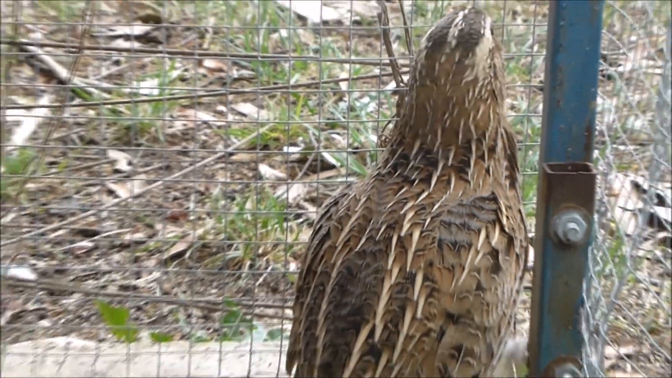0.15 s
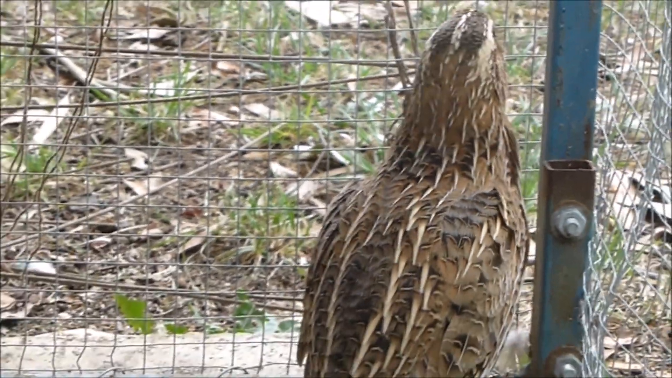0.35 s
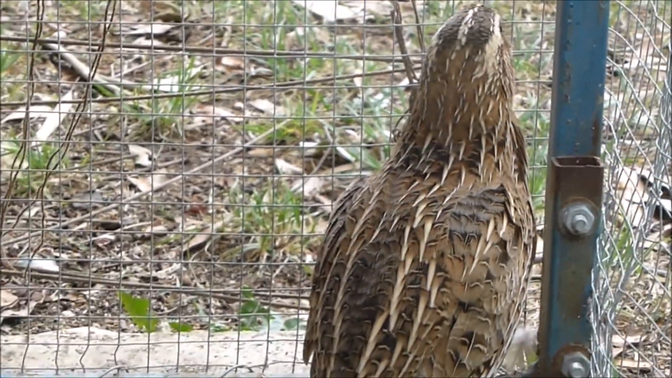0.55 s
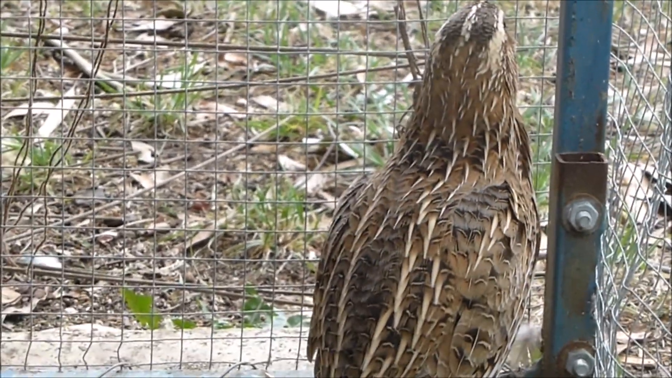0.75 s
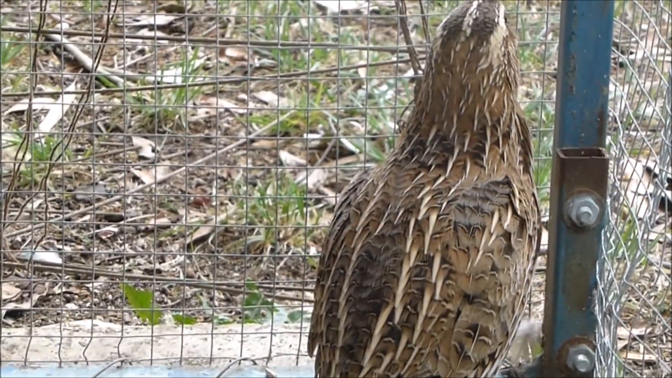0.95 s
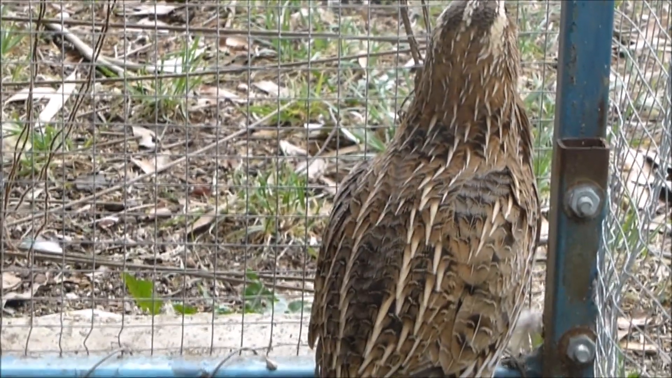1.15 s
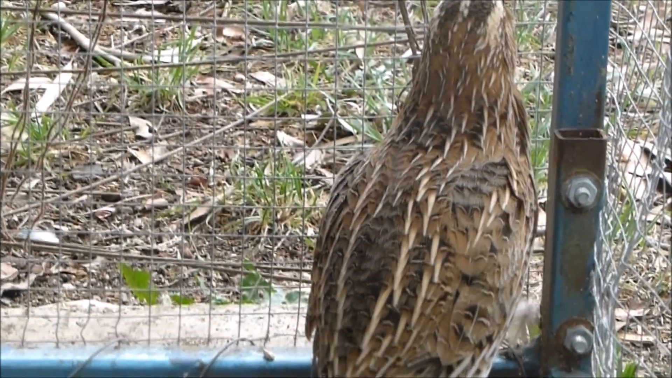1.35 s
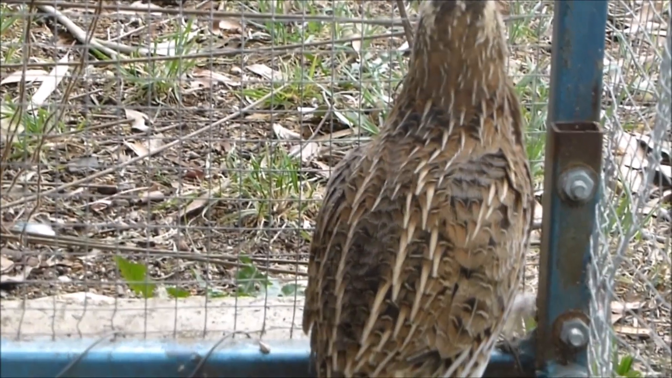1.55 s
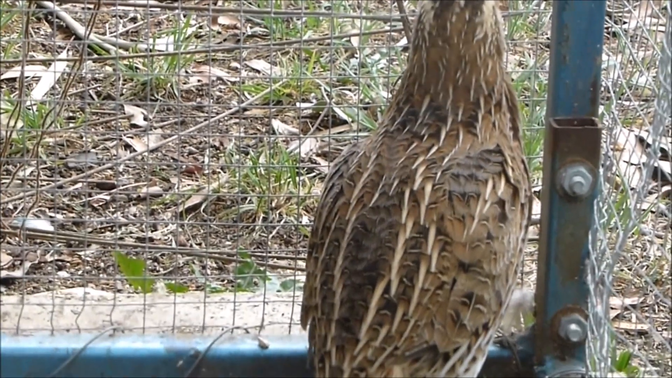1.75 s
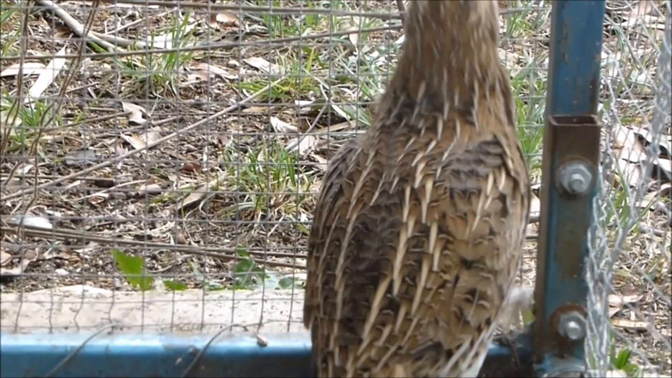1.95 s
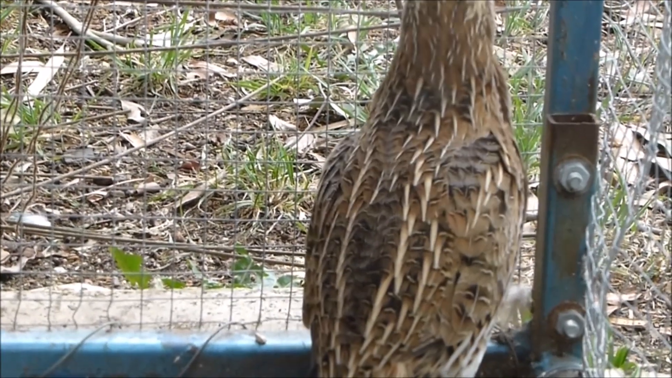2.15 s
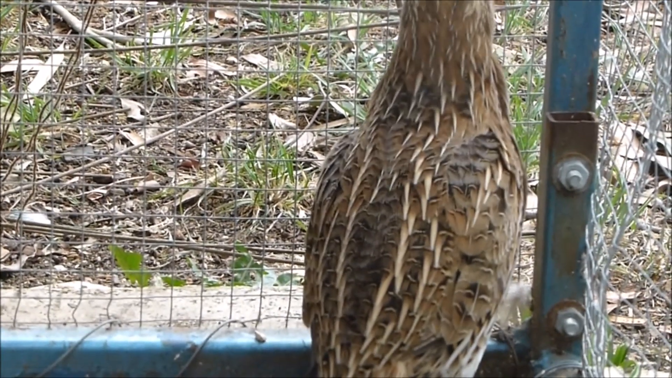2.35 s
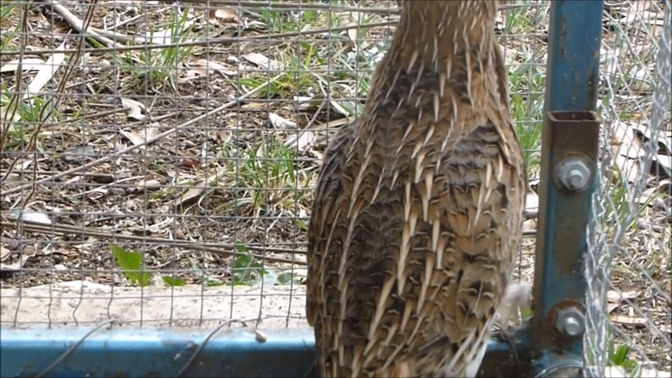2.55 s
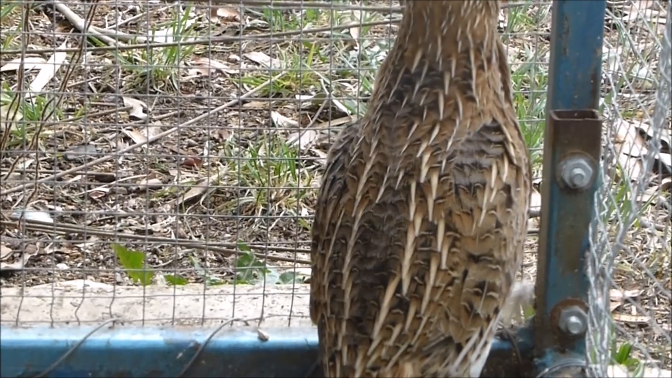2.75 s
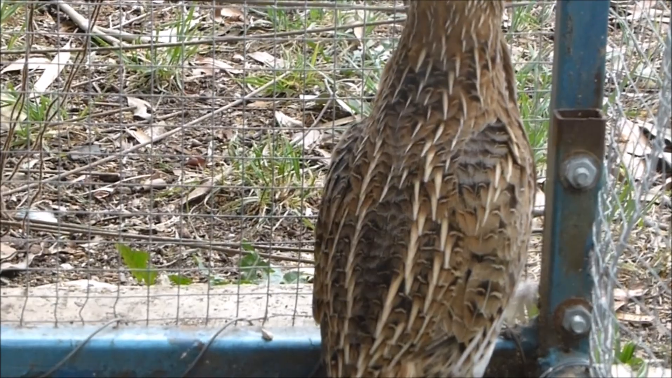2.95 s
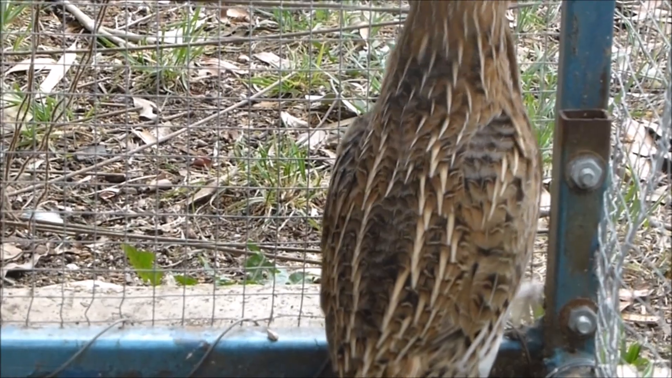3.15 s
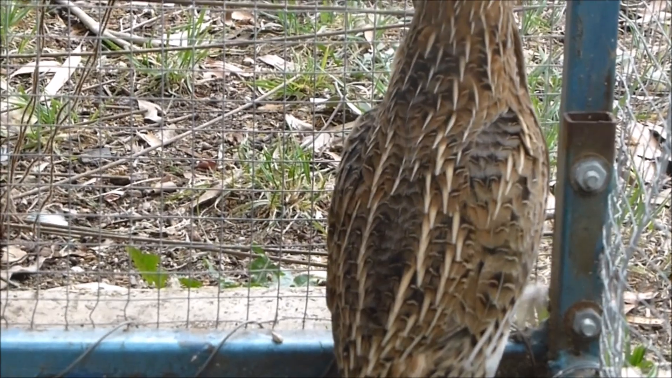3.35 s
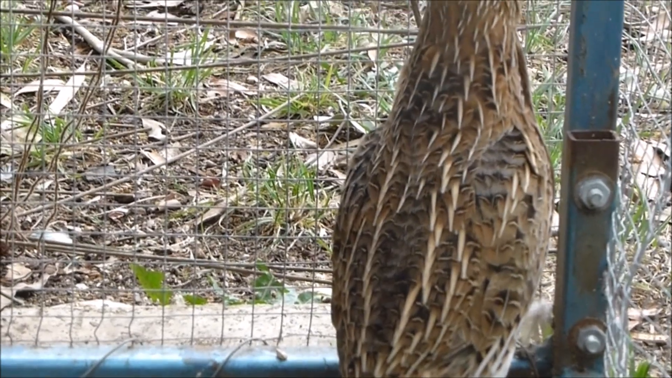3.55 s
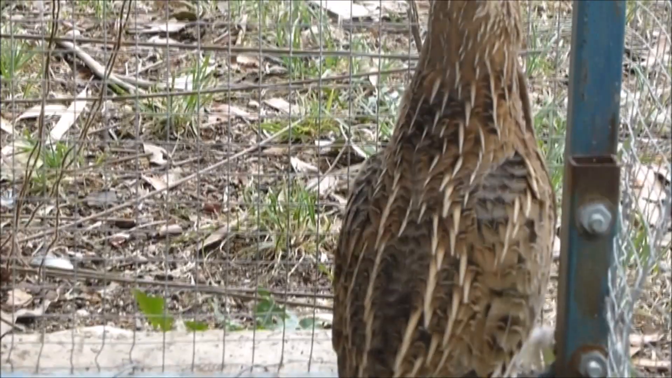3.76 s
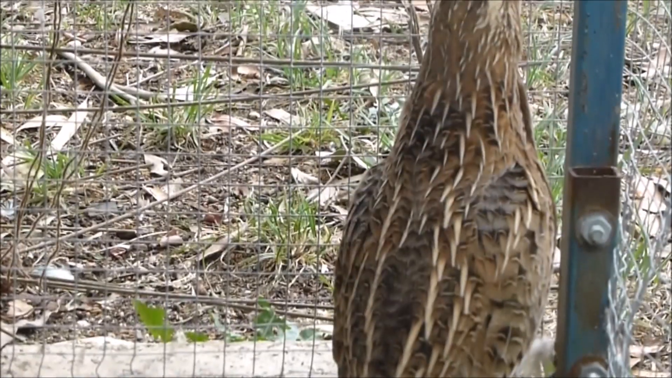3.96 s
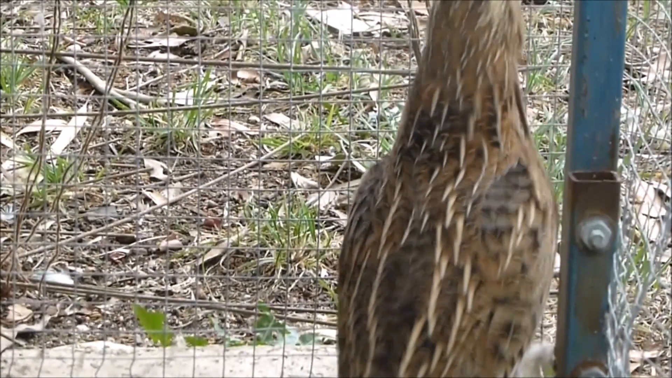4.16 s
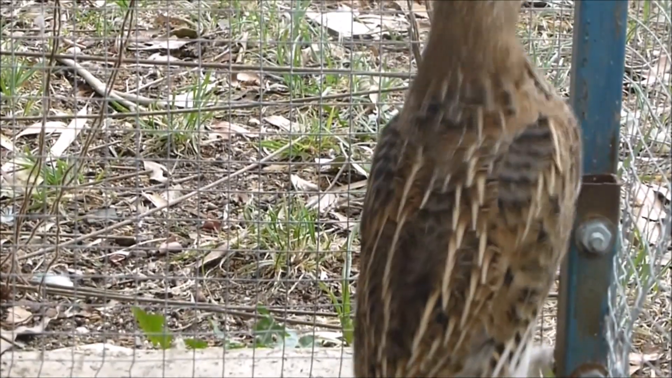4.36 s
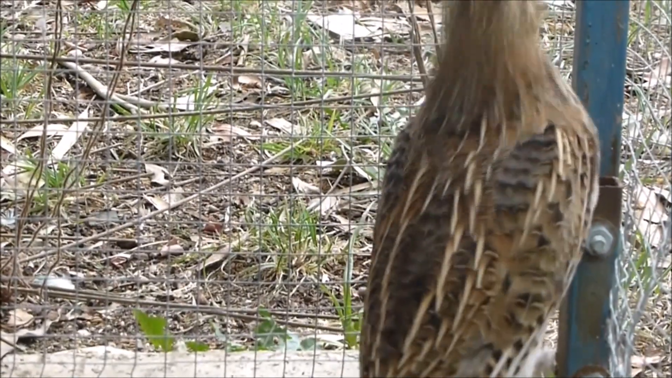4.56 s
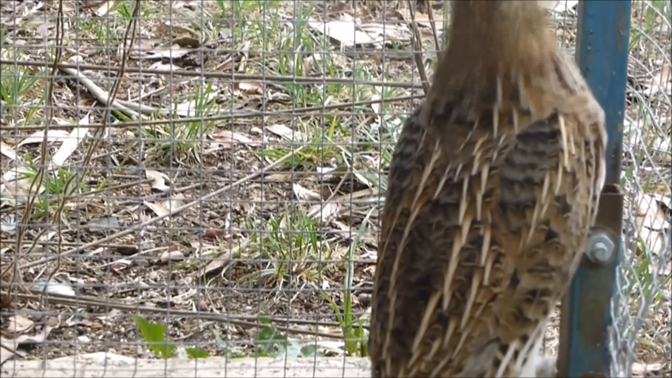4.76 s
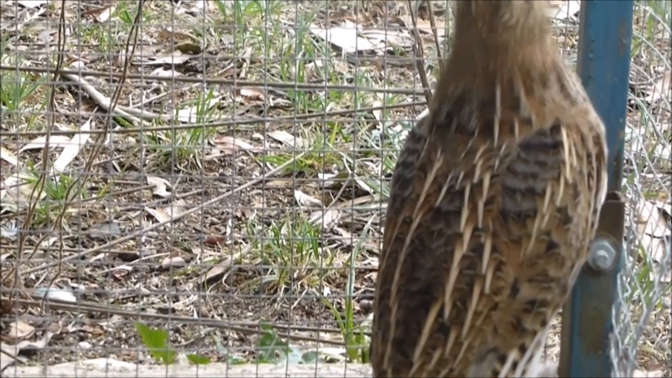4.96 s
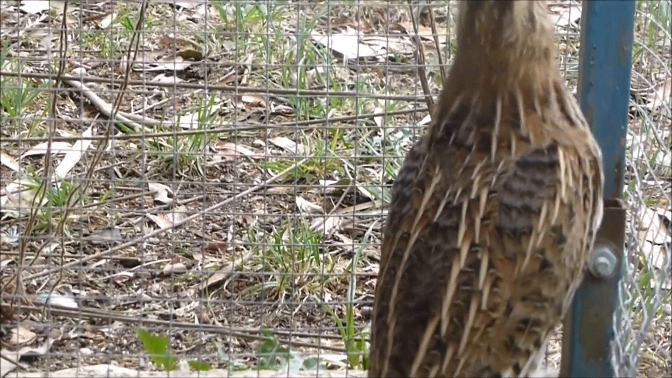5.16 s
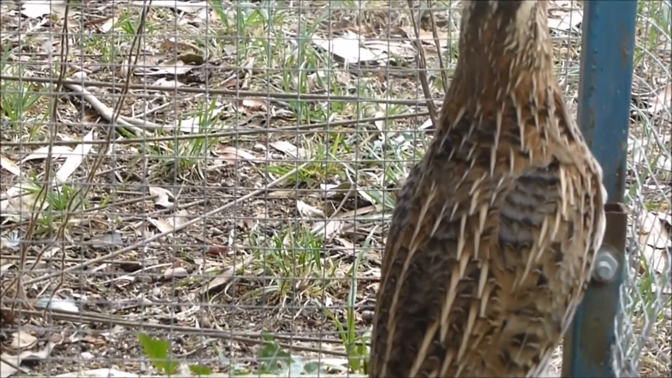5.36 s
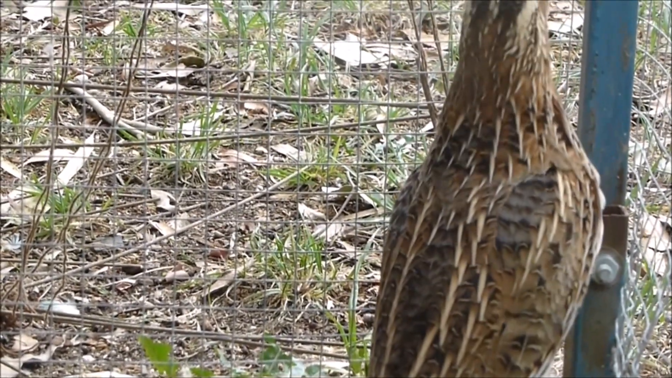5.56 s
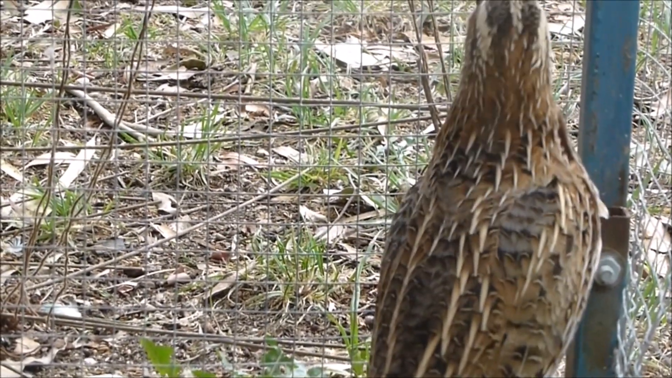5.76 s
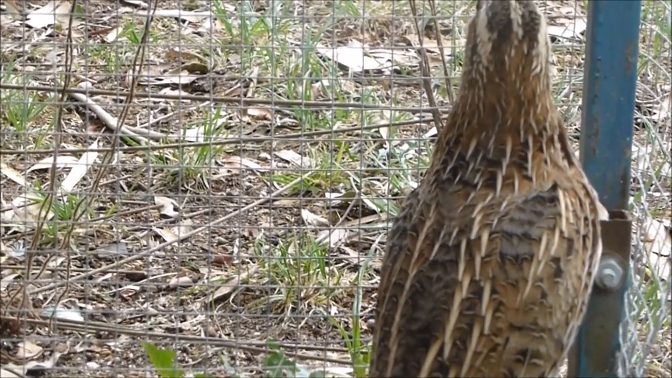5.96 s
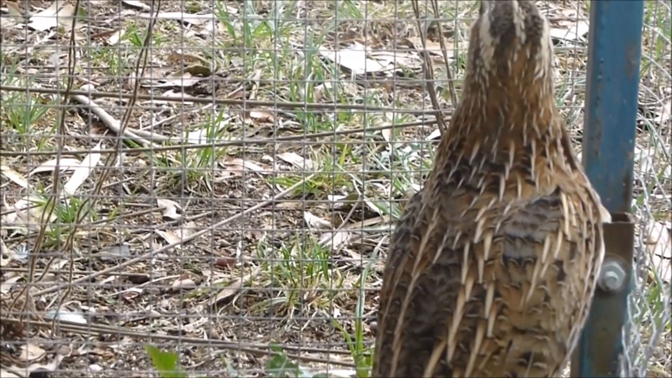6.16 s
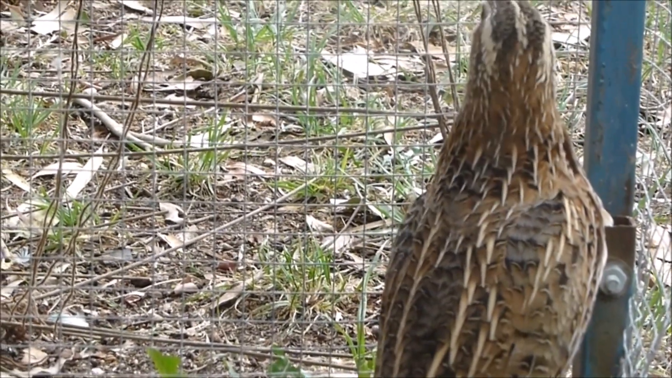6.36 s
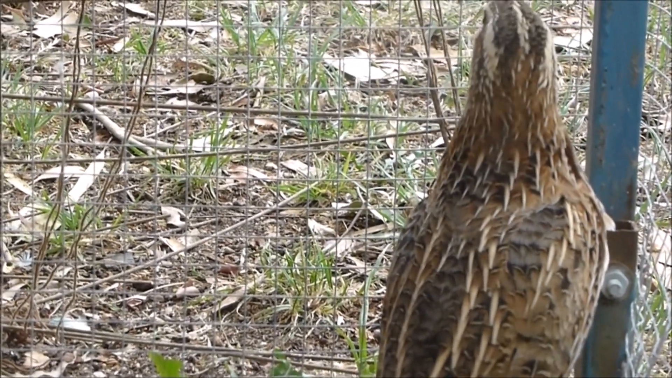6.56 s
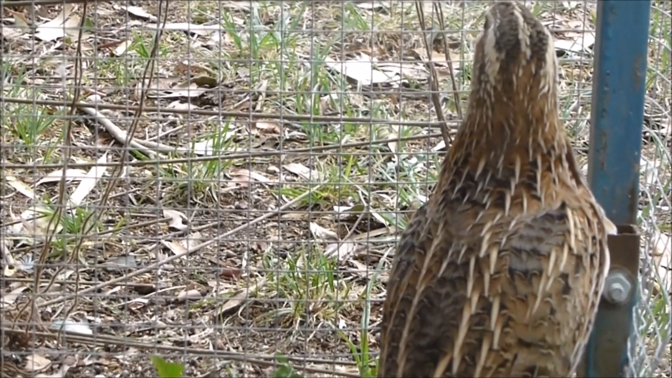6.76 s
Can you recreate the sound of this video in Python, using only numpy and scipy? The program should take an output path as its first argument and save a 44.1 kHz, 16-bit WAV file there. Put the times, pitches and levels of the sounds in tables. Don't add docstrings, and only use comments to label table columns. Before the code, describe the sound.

Close stereo microphone in an outdoor pen. Soft traffic hum and air hiss lie underneath. A quail gives a short high trembling whistle almost at once, then only scattered claw scrapes, metallic ticks and faint far chirps follow. Past the middle comes a sudden sharp note, a thin squeak, and a loud, harsh, fast-wavering crow that dies in weak whistles. The background dips under it, then returns with a few late foot knocks.

```python
import sys
import numpy as np
from scipy import signal
from scipy.fft import rfft, irfft, next_fast_len
from scipy.io import wavfile
from scipy.ndimage import uniform_filter1d

SR = 44100
rng = np.random.default_rng(int(sys.argv[2]) if len(sys.argv) > 2 else 0)


def makeup_ratio(level_db):
    decades = np.asarray(level_db, float) / 20
    return 10 ** decades


def wrap_up_sound(samples):
    columns = np.atleast_2d(samples).T
    tamed = np.clip(columns, -1, 1)
    steps = np.round(tamed * 32767).astype(np.int16)
    wavfile.write(sys.argv[1], SR, steps)


N = 299880
T = np.arange(N) / SR


def unit(x):
    return x / np.sqrt(np.mean(np.abs(x) ** 2) + 1e-20)


def along(points, hz):
    f, v = np.transpose(points)
    return np.interp(np.log(hz + 1), np.log(f + 1), v)


def curves(rows, at=T):
    x, *columns = np.transpose(rows)
    return [np.interp(at, x, column) for column in columns]


def filtered(x, response):
    m = next_fast_len(N + SR // 2)
    return irfft(rfft(x, m) * response(np.fft.rfftfreq(m, 1 / SR)), m)[..., :N]


def flutter(width_hz, size=N):
    m = next_fast_len(size + SR // 4)
    lowpass = np.exp(-(np.fft.rfftfreq(m, 1 / SR) / width_hz) ** 2)
    a, b = irfft(rfft(rng.standard_normal((2, m))) * lowpass, m)
    return unit(a + 1j * b)[:size]


def resonances(modes, f):
    return sum((-1) ** i * makeup_ratio(db) * 1j * f * w / (c * c - f * f + 1j * f * w)
               for i, (c, w, db) in enumerate(modes))


def whistle(hz, rough, overtones_db, width_hz):
    turn = np.exp(2j * np.pi * np.cumsum(hz) / SR)
    shake = flutter(width_hz, size=len(hz))
    out = 0
    for k, db in enumerate(overtones_db):
        share = np.clip(rough * (1 + k), 0, 1)
        size = np.sqrt(1 - share) + np.sqrt(share) * shake
        out = out + makeup_ratio(db) * np.real(size * turn ** (k + 1))
    return out


def voice(rows, overtones_db, width_hz, edge=0.0029):
    start, end = rows[0][0], rows[-1][0]
    out, span = np.zeros(N), (T > start) & (T < end)
    t = T[span]
    hz, level_db, rough = curves(rows, t)
    gate = np.clip(np.minimum(t - start, end - t) / edge, 0, 1)
    out[span] = gate * makeup_ratio(level_db) * whistle(hz, rough, overtones_db, width_hz)
    return out


def notes(rows, rough, overtones_db, width_hz, edge=0.004, fade_db=5):
    out = 0
    for s, length, start_hz, end_hz, db in rows:
        points = [(s, start_hz, db + fade_db / 2, rough), (s + length, end_hz, db - fade_db / 2, rough)]
        out = out + voice(points, overtones_db, width_hz, edge)
    return out


# frequency in Hz, left-right likeness from -1 to 1.
LIKENESS = [(60, 0.25), (180, 0.93), (550, 0.52), (1650, -0.34), (4970, 0.5), (15000, 0.69)]


def rush(spectrum, patchy_db):
    z = signal.stft(rng.standard_normal((2, N)), nperseg=512)[2]
    field = uniform_filter1d(uniform_filter1d(rng.standard_normal(z.shape[1:]), 5, 0), 10, 1)
    pair = signal.istft(z * makeup_ratio(patchy_db * unit(field)), nperseg=512)[1][:, :N]

    def spread(hz):
        angle = np.arccos(np.clip(along(LIKENESS, hz), -1, 1)) / 2
        return makeup_ratio(along(spectrum, hz)) * [np.cos(angle), np.sin(angle)]

    mid, side = filtered(pair, spread)
    return unit(np.array([mid + side, mid - side]))


# frequency in Hz, level in dB per Hz.
TRAFFIC_HUM = [(53, -30.5), (95, -10.5), (340, -3), (480, -4.5), (560, -7.5), (1080, -8), (2000, -22.5),
               (4400, -120)]
# time in seconds, half length in seconds, swell in dB.
VEHICLES = [
    (.47, 0.15, 4),
    (3.52, 0.24, 3),
    (4.249, 0.16, 1),
    (6.196, 0.13, 1),
]
# frequency in Hz, width in Hz, level in dB under the traffic.
MACHINE = (465, 25, -9.5)
# frequency in Hz, level in dB per Hz.
AIR_HISS = [(820, -31.5), (1400, -1.5), (2040, 1), (3230, -6.5), (4040, -3.5), (9910, -5.5), (14000, -12),
            (16000, -18.5)]
# time in seconds, half length in seconds, swell in dB.
LEAVES = (3.7, 0.74, 3.3)
# frequency in Hz, level in dB per Hz.
PORT_RUMBLE = [(12, -21), (25, -3), (60, -3.5), (110, -13), (300, -62)]
# start, attack, hold and recovery in seconds, depth in dB.
GAIN_DIPS = [
    (4.399, 0.42, 0.23, .2, 7.5),
    (5.393, 0.1, 0.25, 1.4, 3.5),
]


def outdoors():
    swell_db = sum(db * np.exp(-((T - s) / half) ** 2) for s, half, db in VEHICLES)
    duck_db = 0
    for s, attack, hold, recovery, depth_db in GAIN_DIPS:
        shape = np.minimum((T - s) / attack, 1 - (T - s - attack - hold) / recovery)
        duck_db = duck_db - depth_db * np.clip(shape, 0, 1)
    hz, width_hz, drone_db = MACHINE
    drone = makeup_ratio(drone_db) * np.real(flutter(width_hz) * np.exp(2j * np.pi * hz * T))
    hum = rush(TRAFFIC_HUM, patchy_db=1.0) + makeup_ratio(swell_db) * drone
    hum = makeup_ratio(-54 + swell_db + duck_db) * hum
    s, half, breeze_db = LEAVES
    stir_db = breeze_db * np.exp(-((T - s) / half) ** 2)
    hiss = makeup_ratio(-60 + stir_db + 0.54 * duck_db) * rush(AIR_HISS, patchy_db=.4)
    rumble = unit(filtered(rng.standard_normal((2, N)), lambda f: makeup_ratio(along(PORT_RUMBLE, f))))
    return hum + hiss + makeup_ratio(-81) * rumble


# start in seconds, length in seconds, start Hz, end Hz, level in dB.
DISTANT_CHIRPS = [(.024, .036, 4650, 4570, -54), (.034, .062, 4150, 4060, -56.5),
                  (2.92, 0.095, 2350, 2490, -62), (2.95, 0.19, 2730, 2800, -62),
                  (2.98, 0.085, 3510, 3470, -52.5), (3.04, 0.14, 3450, 3330, -56),
                  (3.05, .16, 2650, 2450, -64.5), (4.255, 0.033, 4270, 4180, -56),
                  (5.69, 0.167, 3080, 3013, -66.5), (6.02, .12, 2807, 2880, -66),
                  (6.06, .13, 3105, 3160, -65), (6.41, .16, 2663, 2600, -62), (6.45, 0.15, 3540, 3520, -59)]
# start in seconds, length in seconds, start Hz, end Hz, level in dB.
INSECT_NOTES = [
    (1.16, 0.14, 2860, 2790, -65),
    (1.88, .42, 2780, 2808, -73.5),
]


def far_animals():
    birds = notes(DISTANT_CHIRPS, .9, [0], width_hz=170, edge=.018)
    return birds + notes(INSECT_NOTES, 0.089, [0], width_hz=21, edge=0.029)


# frequency in Hz, t60 in seconds.
YARD_DECAY = [(500, 0.1), (2000, 0.39), (10000, 0.14)]


def yard(x, longer=1):
    hz, t, z = signal.stft(rng.standard_normal((2, SR // 2)), SR, nperseg=256)
    decay = makeup_ratio(-60 * t / longer / along(YARD_DECAY, hz)[:, None])
    tail = signal.istft(z * decay, SR, nperseg=256)[1]
    tail[1] = 0.19 * tail[0] + 0.48 * tail[1]
    delayed = np.pad(x, (300, 0))[None]
    return signal.fftconvolve(delayed, tail / np.linalg.norm(tail[0]), axes=1)[:, :N]


# time in seconds, peak in dB, scrape t60 in seconds, ring in dB,
# scrape centre in Hz.
CLAW_TAPS = [(.034, -50, .07, -30, 4500), (0.473, -40.5, 0.034, -29, 8100),
             (0.653, -35, 0.015, -11.5, 5000), (.700, -43.5, 0.018, -20, 5500),
             (0.884, -38, 0.012, -43, 5600), (1.4, -41.5, 0.023, -8.5, 9000),
             (2.502, -48.5, 0.064, -5, 5030), (2.724, -37, 0.05, 2.5, 6500),
             (3.423, -29.5, 0.04, -4.5, 6980), (3.485, -41.5, 0.045, -3, 6000),
             (3.509, -35, 0.027, -16, 9000), (3.979, -45, 0.035, -30, 8000), (4.102, -35, 0.049, 1, 7400),
             (4.557, -37.5, 0.017, -18, 6480), (6.390, -50.5, 0.072, -22, 6000),
             (6.704, -50.5, 0.051, -18, 2500), (6.775, -31.5, 0.012, -27, 4970),
             (4.386, -42, 0.052, -30, 3000), (6.425, -48, 0.041, -29, 7000),
             (6.735, -47.5, 0.051, -30, 7000)]
# frequency in Hz, level in dB, t60 in seconds.
FRAME_MODES = [(343, -3, 0.32), (480.4, -12, 0.12), (790, -7, .15), (965, -4.5, .12), (1038, -1, 0.23),
               (1400, -14, .1), (1850, -17, .12), (2250, -17, .2)]
# time in seconds, level in dB, frequency in Hz, t60 in seconds.
FOOT_THUDS = [
    (.165, -34.5, 125, 0.066),
    (0.266, -25.5, 194, 0.014),
    (1.404, -33, 502, 0.047),
    (3.746, -37, 132, 0.025),
    (6.776, -17.5, 230, 0.0081),
]


def frame_ring(t):
    ring = 0
    for hz, db, t60 in FRAME_MODES:
        decay = makeup_ratio(db + rng.normal(0, 1.8) - 60 * t / t60)
        unsteady = 0.23 + 0.74 * flutter(60, size=len(t))
        build = 1 - np.exp(-(t * hz / 6) ** 2)
        ring = ring + decay * np.real(np.exp(2j * np.pi * hz * t) * unsteady) * build
    return ring


def taps():
    out, t = np.zeros(N + SR), np.arange(SR // 3) / SR
    f = np.fft.rfftfreq(len(t), 1 / SR)
    for s, db, t60, ring_db, hz in CLAW_TAPS:
        band = 1 + (np.log((f + 1) / hz) / .45) ** 2
        scrape = unit(irfft(rfft(rng.standard_normal(len(t))) / band, len(t)))
        scrape = scrape * makeup_ratio(-60 * t / t60) * (1 - np.exp(-(t + .0005) / 0.0033))
        crack = makeup_ratio(-6.5 - 60 * t / .02) * unit(np.diff(rng.standard_normal(len(t) + 2), 2))
        tap = scrape + crack + makeup_ratio(ring_db - 3.5) * frame_ring(t)
        out[round(s * SR):][:len(t)] += makeup_ratio(db + 0.5) * tap
    for s, db, hz, t60 in FOOT_THUDS:
        out[round(s * SR):][:len(t)] -= makeup_ratio(db - 60 * t / t60) * np.sin(2 * np.pi * hz * t)
    return filtered(out[:N], lambda f: (1j * f / 110 / (1 + 1j * f / 110)) ** 2)


# end in seconds, top in dB, trough in dB, lateness of the trough as a power
CROW_SWOOPS = [(4.701, -20, -10, 1), (4.742, -14, -6.5, 0.93), (4.782, -18, -9.5, 0.98),
               (4.823, -24, -9.5, 0.97), (4.871, -27, -11.5, 1.3), (4.918, -20, -7.5, 1.19),
               (4.962, -21, -9.5, .98), (5.005, -19, -9.5, 1.09), (5.05, -24, -9.5, 1.15),
               (5.093, -19.5, -9, 1.04), (5.136, -22.5, -11.5, 1.02), (5.177, -20.5, -9, 0.94),
               (5.221, -26.5, -13.5, 0.95), (5.264, -27.5, -14, 0.9), (5.311, -33, -16, 1.04),
               (5.346, -39, -33, .96), (5.376, -39, -30, 1.04)]


def swoop_clock():
    ends, late = np.transpose(CROW_SWOOPS)[[0, 3]]
    k = np.clip(np.searchsorted(ends, T), 1, len(ends) - 1)
    part = (T - ends[k - 1]) / (ends[k] - ends[k - 1])
    return k, np.clip(part, 0, 1) ** late[k], (part >= 0) & (part <= 1)


def rasping(modes, rate, low_hz, high_hz):
    pulses = (rng.random(N) < rate / SR) * rng.normal(0, 1, N) + .04 * rng.standard_normal(N)

    def tract(f):
        low = f / low_hz
        highpass = (low ** 2 / (1 - low ** 2 + 1.2j * low)) ** 3
        return resonances(modes, f) * highpass / (1 + (f / high_hz) ** 8)

    return unit(filtered(pulses, tract))


def puffs(rows):
    gain = 0
    for s, rise, hold, db, fall_db in rows:
        climb_db = 20 * np.clip(1 - (T - s) / rise, 0, 1)
        release_db = fall_db * np.clip(T - s - rise - hold, 0, 9)
        gain = gain + (T > s) * makeup_ratio(db - climb_db - release_db)
    return gain


# part of its length 0-1, height of pitch 0-1, level in dB.
SWOOP_SHAPE = [(0, .32, -1), (.12, 1, -3), (.27, .9, -8), (.42, .35, -5), (.53, .1, 0), (.72, 0, -6.5),
               (.87, .09, 1), (.94, .18, 1), (1, .32, -14)]
# frequency in Hz, width in Hz, level in dB.
OPEN_BEAK = [(2010, 360, -1), (2600, 600, 0.5), (3733, 200, 2), (5500, 980, -7), (7000, 520, -25)]
# frequency in Hz, width in Hz, level in dB.
THROAT_MODES = [(1171, 474, 3), (1650, 780, 2), (2450, 670, -7.5), (3610, 200, -14.5)]
# start, attack and hold in seconds, peak in dB, release in dB per second.
RASP_BREATHS = [
    [(4.397, 0.011, 0.0078, -22, 199.5)],
    [(4.676, 0.013, 0.014, -19.5, 297.5), (4.72, 0.15, 0.37, -22.5, 97)],
    [(0.206, 0.14, 0.036, -64, 300)],
]
# start, attack and hold in seconds, peak in dB, release in dB per second.
HISS_BREATHS = [
    [(4.401, 0.017, .002, -31.5, 307)],
    [(4.674, .017, .014, -31, 300), (4.70, .03, .40, -42, 105)],
    [(.210, 0.016, 0.125, -47.5, 250)],
]
# frequency in Hz, level in dB per Hz.
HISS_COLOURS = [
    [(1940, -39.5), (3300, -10.5), (4020, -22.5), (4590, -12), (7190, 0.5), (8160, -12.5), (13500, -27),
     (16000, -28.5)],
    [(2470, -32.5), (4200, -8), (6350, -15), (7690, -14.5), (11100, -21), (12000, -21.5), (13700, -23),
     (16000, -31)],
    [(2290, -34), (3900, -9), (4550, -12.5), (5690, -8), (6150, -9), (10200, -16), (14800, -28),
     (16000, -51.5)],
]


def breath():
    k, part, inside = swoop_clock()
    height = curves(SWOOP_SHAPE, part)[0]
    squawk_db = -16.5 * np.clip(1 - height / 0.71, 0, 1)
    top_db = np.transpose(CROW_SWOOPS)[1, k]
    squawk_gain = uniform_filter1d(inside * makeup_ratio(top_db + squawk_db - 4.0), size=70)
    squawk = squawk_gain * rasping(OPEN_BEAK, rate=2200, low_hz=1290, high_hz=7970)
    rasp = rasping(THROAT_MODES, rate=2400, low_hz=1020, high_hz=4200)
    swell_db = inside * 8.5 * np.exp(-((part - .56) / .2) ** 2)
    throat_open = np.clip((5.375 - T) / 0.01, 0, 1)
    rasp = rasp * makeup_ratio(swell_db - 3.0) * throat_open
    calls = []
    for low, high, spectrum in zip(RASP_BREATHS, HISS_BREATHS, HISS_COLOURS):
        noise = rng.standard_normal(N) * (0.82 + np.abs(flutter(270)))
        hiss = unit(filtered(noise, lambda f: makeup_ratio(along(spectrum, f))))
        patches_db = 2.6 * np.real(flutter(40))
        hiss = puffs(high) * makeup_ratio(inside * 0.15 * squawk_db + patches_db) * hiss
        calls.append(puffs(low) * rasp + hiss)
    return calls[0] + calls[1] + squawk, calls[2]


# climb over fall in dB, fill of the trough in dB, trough in Hz, roughness 0-1.
SWOOP_EFFORT = [(0, 0, 1600, .05), (1, 0, 1720, .06), (5.5, 0, 1600, .08), (8.5, 4, 1620, .08),
                (2, 5, 1600, .15), (4, 3, 1580, .1), (4, 2, 1600, .1), (5, 6, 1620, .15), (5, 5, 1680, .2),
                (-1, 7, 1700, .15), (2.5, 0, 1640, .4), (-2, -2, 1900, .45), (2, 9, 1880, .3),
                (1, 0.5, 1900, .45), (-1, 3, 2080, .5), (3.5, 3, 2200, .7), (-3, 2, 2260, .7)]
# frequency in Hz, width in Hz, level in dB.
WINDPIPE = [(8300, 900, 0), (9500, 900, 0), (12200, 1200, -9)]


def crow():
    k, part, inside = swoop_clock()
    _, top_db, trough_db, _ = np.transpose(CROW_SWOOPS)[:, k]
    push_db, fill_db, low_hz, rough = np.transpose(SWOOP_EFFORT)[:, k]
    height, level_db = curves(SWOOP_SHAPE, part)
    sink = np.clip((part - .3) / 0.14, 0, 1)
    climb = np.clip((part - .62) / .2, 0, 1)
    effort_db = top_db + (trough_db - push_db / 2 - top_db) * sink + push_db * climb
    effort_db = effort_db + fill_db * np.exp(-((part - .71) / 0.068) ** 2)
    gain = uniform_filter1d(inside * makeup_ratio(effort_db + level_db), size=50)
    hz = uniform_filter1d(low_hz + (3800 - low_hz) * height, 60)
    harsh = height * np.clip((part - .08) / .08, 0, 1) * (part < .7)
    tone = gain * whistle(hz, rough + harsh, [0, -28, -38], width_hz=527)
    shine_hz = 2250
    low = np.clip((shine_hz - hz) / 250, 0, 1) * np.clip((.8 - part) / .15, 0, 1)
    upper = whistle(np.minimum(hz, shine_hz), .17, [-99, -99, -99, 0, 0, 0, 0], width_hz=300)
    return tone + makeup_ratio(-33) * filtered(gain * low * upper, lambda f: resonances(WINDPIPE, f))


# start in seconds, length in seconds, start Hz, end Hz, mean level in dB.
WARBLE_NOTES = [
    (.217, 0.0245, 3540, 3300, -25.5),
    (.236, 0.029, 2780, 2820, -29),
    (.251, 0.015, 3150, 2970, -29),
    (.265, .026, 3580, 3180, -29),
]
# start in
# seconds, length in seconds, # start Hz, end Hz, mean level in dB.
WARBLE_HARSH = [(.205, 0.036, 2400, 2450, -46), (.258, .024, 2250, 2130, -36.5),
                (.288, 0.024, 2260, 2120, -32.5), (.288, 0.03, 3200, 2900, -26.5),
                (.325, 0.038, 3450, 3600, -37), (.252, .012, 3650, 3900, -30),
                (.346, .014, 1900, 1750, -43), (.347, .009, 4900, 4900, -45), (.03, .022, 2400, 2400, -62),
                (0.3, 0.014, 1850, 1600, -45.5), (.31, .022, 5750, 5900, -37)]
# time in seconds, pitch in Hz, level in dB, roughness 0-1.
WARBLE_OPENING = [
    (.180, 2850, -44, .02),
    (.194, 2910, -28.5, 0.03),
    (.208, 2927, -28, 0.1),
    (.223, 2890, -31, 0),
]
# time in seconds, pitch in Hz, level in dB, roughness 0-1.
WARBLE_CLOSING = [(.309, 2850, -35, .2), (.317, 2880, -33, .1), (.321, 2900, -24.5, .07),
                  (.328, 2940, -28, .15), (.331, 2960, -24, .1), (.337, 3010, -22, .1),
                  (.3405, 3040, -30, .1), (.343, 3070, -22, .05), (.347, 3095, -19.5, .1),
                  (.3505, 3100, -31, .2), (.354, 3100, -25.5, .1), (.358, 3110, -34, .2),
                  (.363, 3130, -33, .2), (.370, 3150, -44, .1)]


def warble_whistle():
    out = notes(WARBLE_NOTES, 0.3, [4.5, -10, -15.5, -30], width_hz=280)
    out += voice(WARBLE_OPENING, [1.0, -9.5, -10.0, -28.0], width_hz=400)
    out += voice(WARBLE_CLOSING, [4.5, -24, -22, -32], width_hz=340)
    return out + notes(WARBLE_HARSH, 0.33, [0, -22, -26], width_hz=500, fade_db=7)


# time in seconds, pitch in Hz, level in dB, roughness 0-1.
SHARP_NOTE = [(4.404, 1150, -22, .05), (4.4127, 1400, -3, .02), (4.4147, 1480, -19, .1),
              (4.4163, 1540, -8, .05), (4.4178, 1580, -17, .05), (4.4195, 1601, -3.5, .05),
              (4.439, 1576, -6.5, 0), (4.445, 1590, -17, .2), (4.474, 1560, -21, .4),
              (4.486, 1560, -36, .5), (4.497, 1570, -34, .3), (4.535, 1530, -42.5, .2),
              (4.578, 1520, -38.5, .15)]
# time in seconds, pitch in Hz, level in dB, roughness 0-1.
OTHER_HALF = [
    (4.434, 1330, -22, .2),
    (4.442, 1300, -14, .3),
    (4.455, 1220, -17, .5),
    (4.462, 1180, -16, .4),
    (4.473, 1150, -24, .5),
    (4.488, 1150, -33, .6),
]
# time in seconds, pitch in Hz, level in dB, roughness 0-1.
CROW_ONSET = [
    (4.678, 1210, -17.5, 0.11),
    (4.684, 1345, -11, 0),
    (4.690, 1554, -19, 0.3),
    (4.697, 1734, -2.5, 0),
    (4.702, 1830, -13, 0.1),
]
# start in seconds, length in seconds, start Hz, end Hz, mean level in dB.
SHARP_HARSH = [
    (4.412, 0.011, 2650, 3000, -27),
    (4.470, .022, 2600, 3050, -37),
    (4.44, .016, 3550, 3500, -40),
    (5.225, .089, 1230, 1202, -33),
    (5.315, 0.069, 1193, 1083, -33.5),
    (4.455, .055, 4280, 4200, -53),
    (4.413, .062, 7300, 7250, -42),
    (4.412, .022, 5900, 6350, -40),
    (4.475, .04, 5850, 5300, -52),
]


def sharp_whistle():
    out = voice(SHARP_NOTE, [0, -36, -50], width_hz=220)
    out += voice(OTHER_HALF, [0, -30], width_hz=180)
    out += voice(CROW_ONSET, [0, -36, -50], width_hz=200)
    return out + notes(SHARP_HARSH, 1.0, [0, -26, -36], width_hz=270, fade_db=5.5)


# start in seconds, length in seconds, start Hz, end Hz, mean level in dB.
THIN_NOTES = [
    (4.574, .030, 1500, 1440, -35),
    (4.600, 0.015, 1520, 1624, -39),
]
# time in seconds, pitch in Hz, level in dB, roughness 0-1.
CROW_LEAD_IN = [
    (4.610, 1700, -48, 0.38),
    (4.638, 2478, -37, 0.3),
    (4.662, 2260, -37.5, 0.6),
    (4.686, 2560, -36, .4),
]
# start in seconds, length in seconds, start Hz, end Hz, mean level in dB.
AFTER_NOTES = [
    (5.413, .013, 2800, 3800, -42),
    (5.535, .03, 1900, 1950, -51),
    (5.478, .013, 5700, 5700, -61),
    (5.455, .03, 1700, 1700, -46),
    (5.49, 0.047, 1444, 1470, -43),
    (5.53, .033, 1520, 1600, -43),
    (5.5, 0.0556, 2950, 3100, -58),
    (5.38, .025, 1100, 1080, -56),
]
# start in seconds, length in seconds, start Hz, end Hz, mean level in dB.
DYING_NOTES = [
    (5.333, .017, 2860, 2810, -33),
    (5.369, .030, 3150, 3230, -34),
    (5.390, .032, 2400, 2580, -38),
    (5.422, .027, 2620, 2800, -44),
]


def thin_whistle():
    out = notes(THIN_NOTES, .08, [4, -11.5, -13.5, -23.5, -28.0], width_hz=110, fade_db=2.0)
    out += voice(CROW_LEAD_IN, [0, -28, -26], width_hz=190)
    out += notes(AFTER_NOTES, 0.35, [0, -26], width_hz=215, fade_db=1.0)
    return out + notes(DYING_NOTES, .25, [0, -19, -18], width_hz=200, fade_db=2.5)


def quail():
    call_air, warble_air = breath()
    return warble_whistle() + warble_air, sharp_whistle() + thin_whistle() + crow() + call_air


# frequency in Hz, left over right in dB.
PORT_LEVEL = [(60, -6.5), (200, 2), (380, 4.5), (700, -3.5), (1290, 2), (2380, 2), (4400, 3.5),
              (15000, 1.5)]
# frequency in Hz, lead of the left port in radians.
PORT_LEAD = [(0, 0.015), (950, 0.35), (1550, 0.42), (2410, 0.05), (3360, 0.3), (4130, 0.05), (6400, -0.2),
             (16400, 0.0)]


def at_the_ports(call):
    def path(f):
        bounce = 0.87 * 1j * f * 90 / (1480 ** 2 - f * f + 1j * f * 90)
        bass = 1 / (1 + (f / 450) ** 6)
        tilt = makeup_ratio(along(PORT_LEVEL, f) / 2) * np.exp(.5j * along(PORT_LEAD, f))
        return (1 - bounce - bass) * tilt ** np.array([[1], [-1]])

    return filtered(call, path)


def scene():
    background, far, knock = outdoors(), far_animals(), taps()
    warble, call = quail()
    call = at_the_ports(call)
    warble = warble * makeup_ratio([[3], [-3.5]])
    feet = np.array([knock, np.roll(knock, 1)]) * makeup_ratio([[.6], [-.6]])
    near = call + warble + feet + makeup_ratio(-2.0) * far
    echoes = makeup_ratio(-12.5) * yard(call.mean(0)) + makeup_ratio(-17.0) * yard(warble.mean(0), longer=1.2)
    echoes += makeup_ratio(-6.0) * yard(knock) + makeup_ratio(-3.0) * yard(far)
    return near + echoes + background


def top_cut(x):
    return signal.sosfilt(signal.butter(12, 16810, fs=SR, output="sos"), x)


def record(dry):
    mix = filtered(dry, lambda f: 1 / (1 + (f / 15800) ** 40))
    return top_cut(mix)


dry = scene()
out = record(dry)
wrap_up_sound(out)
```